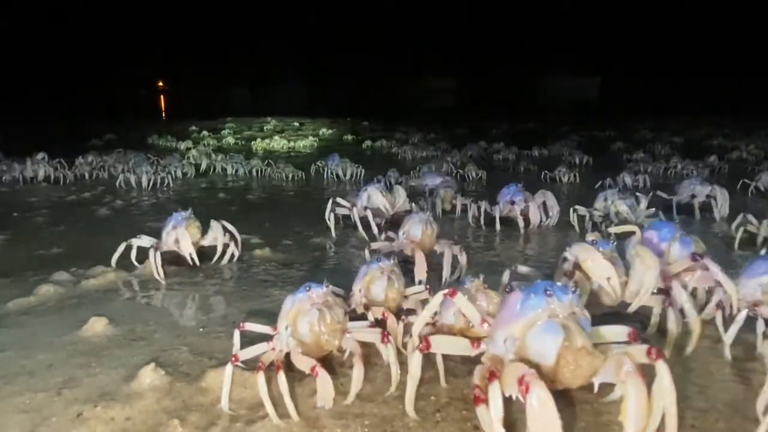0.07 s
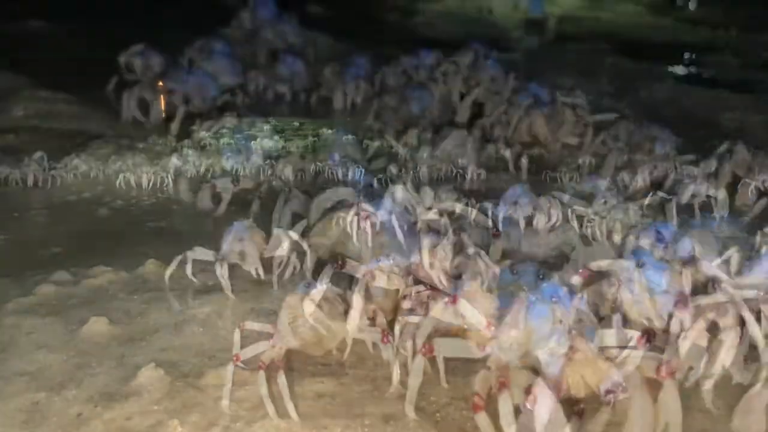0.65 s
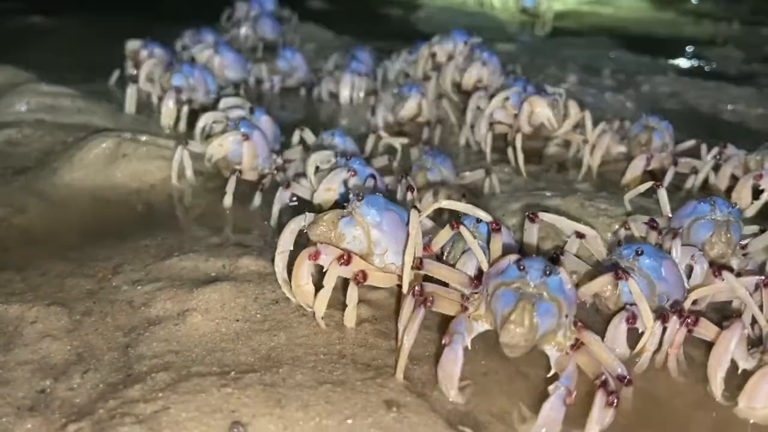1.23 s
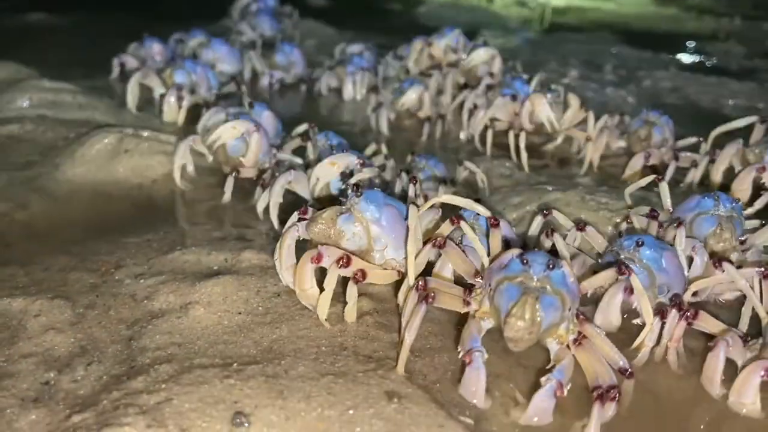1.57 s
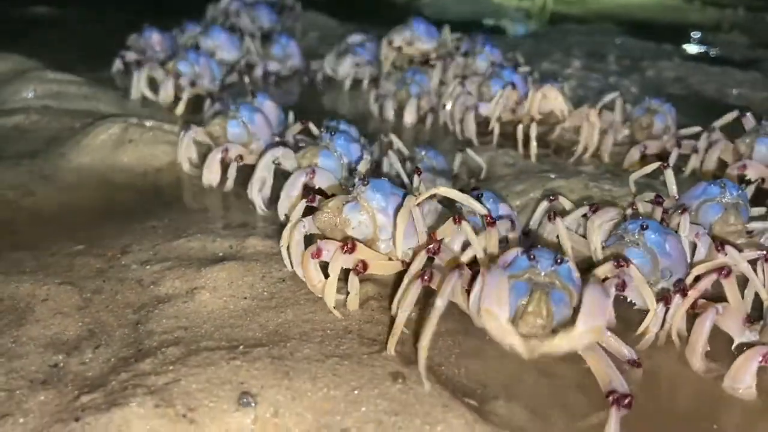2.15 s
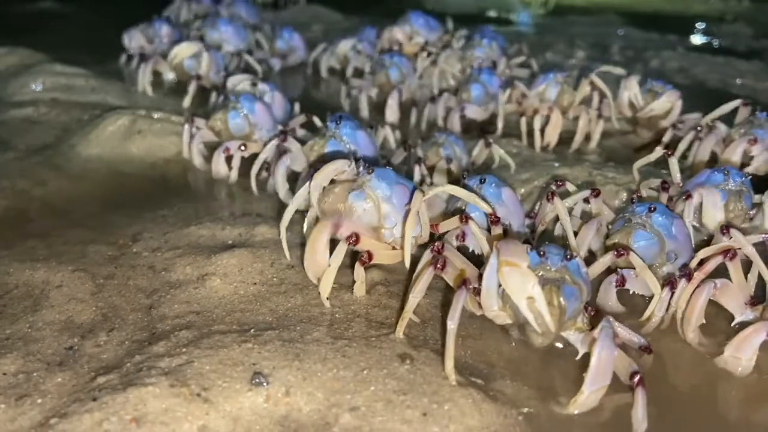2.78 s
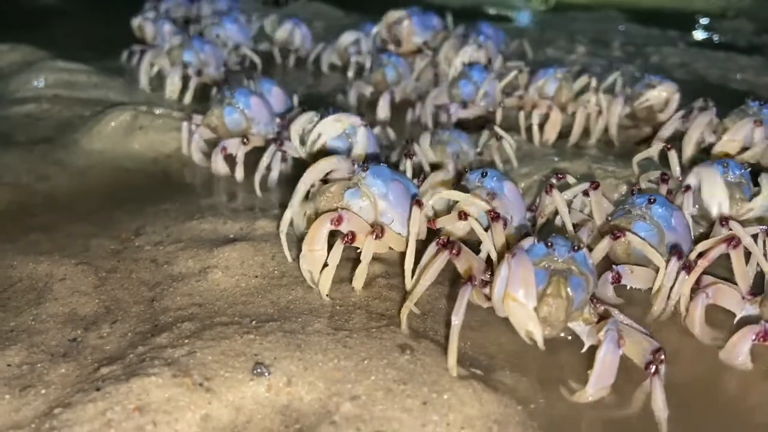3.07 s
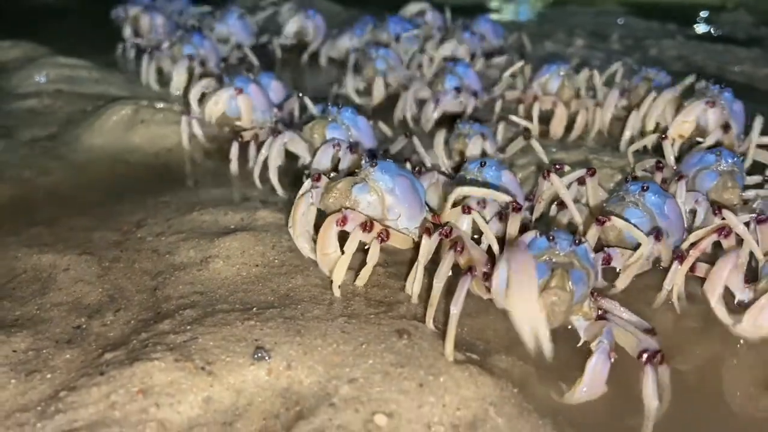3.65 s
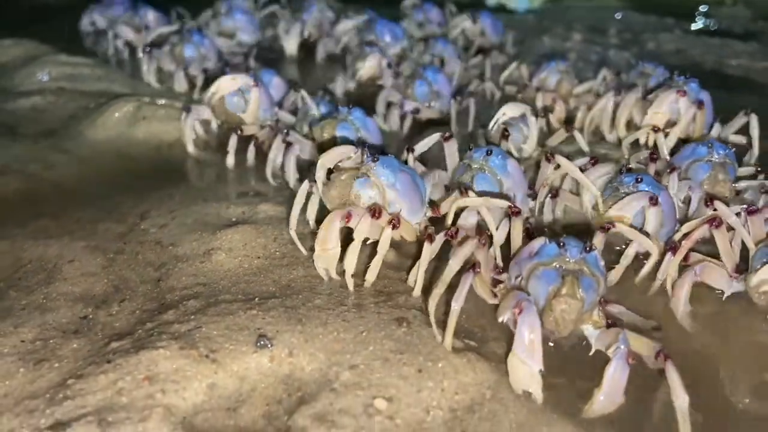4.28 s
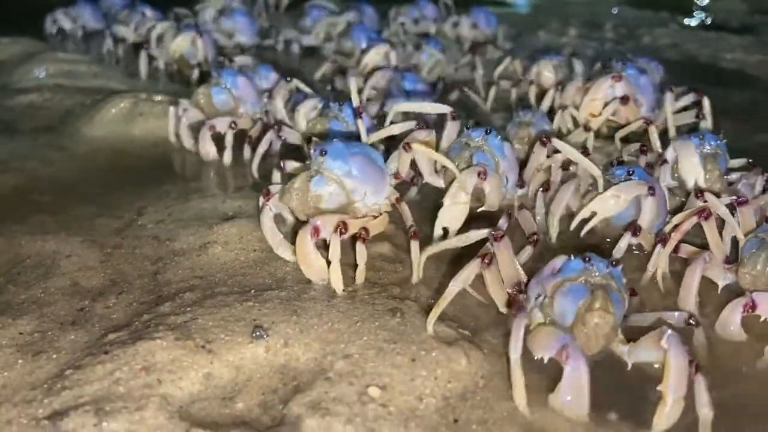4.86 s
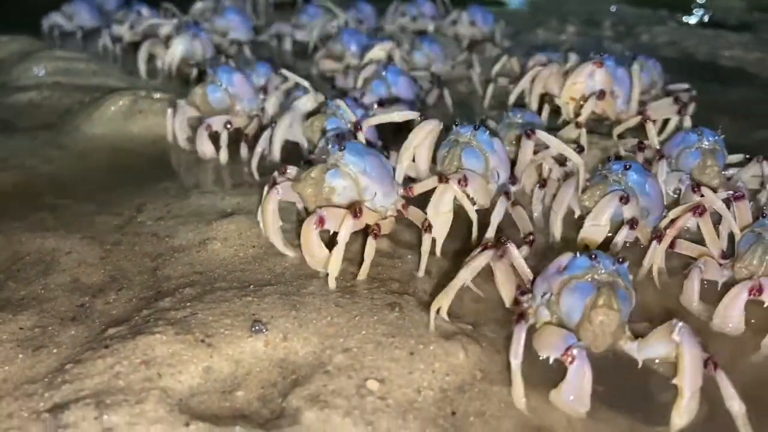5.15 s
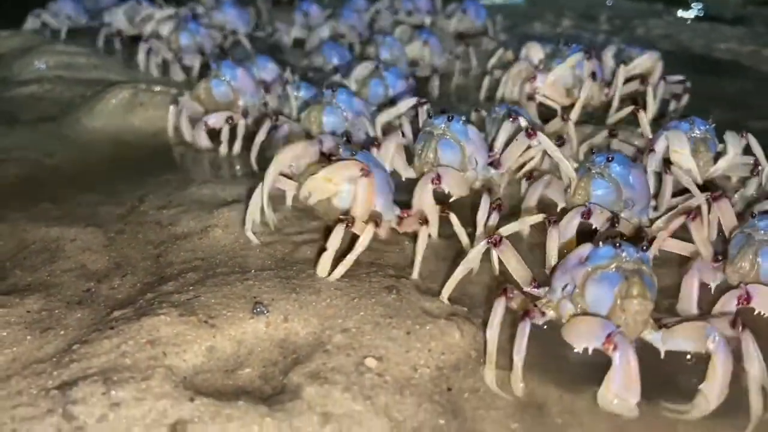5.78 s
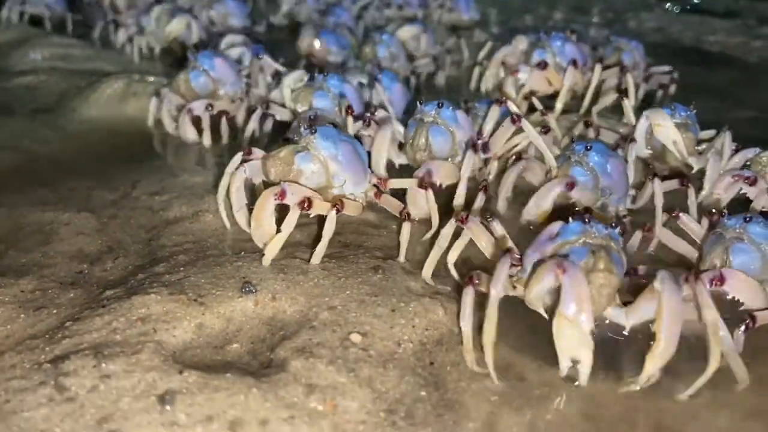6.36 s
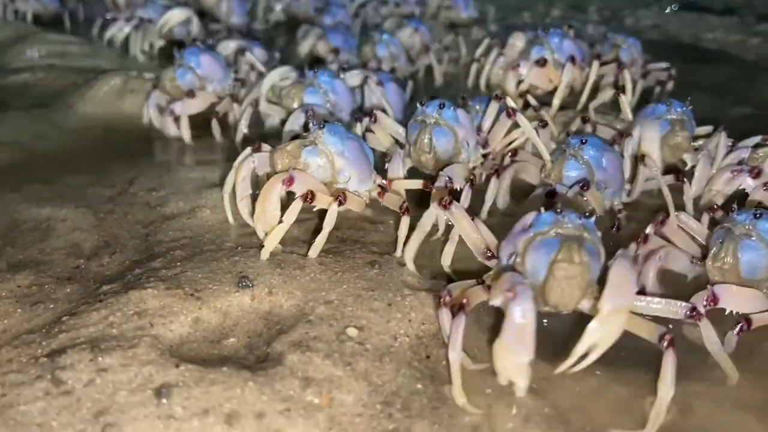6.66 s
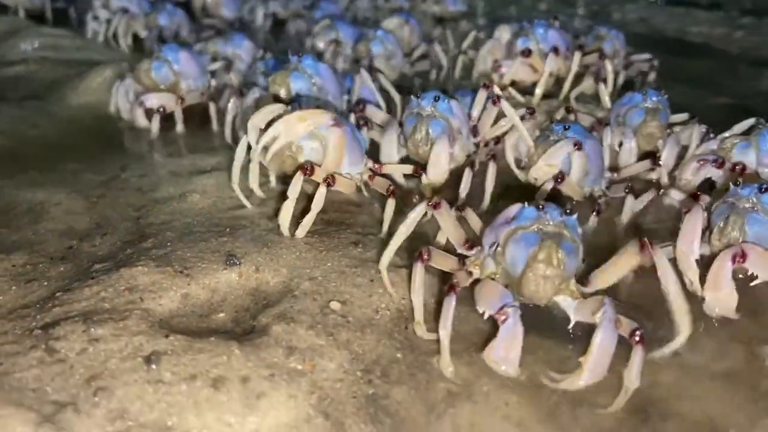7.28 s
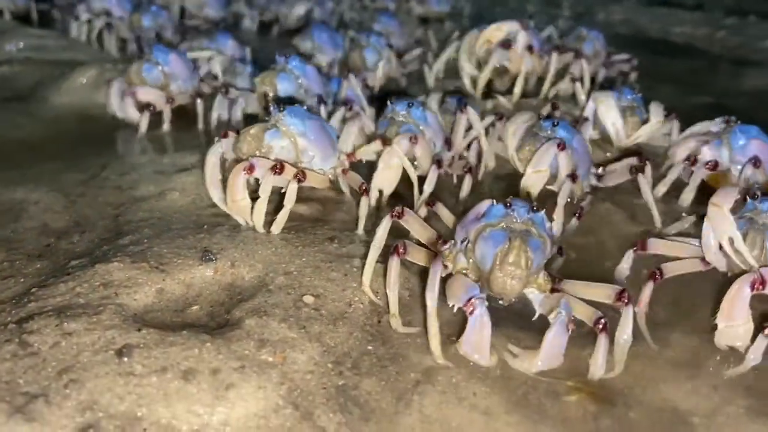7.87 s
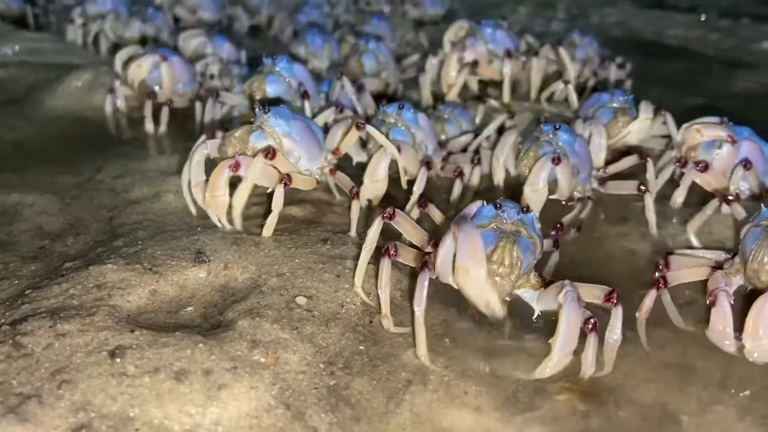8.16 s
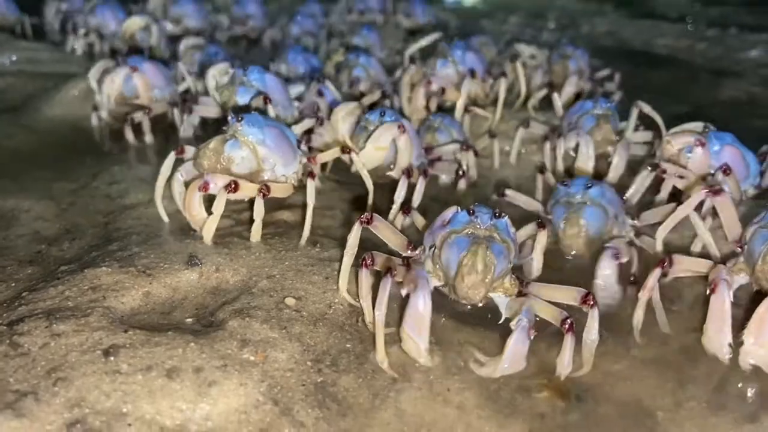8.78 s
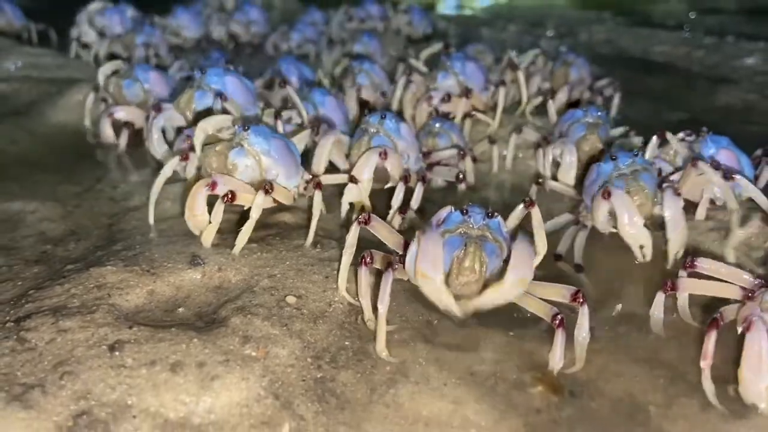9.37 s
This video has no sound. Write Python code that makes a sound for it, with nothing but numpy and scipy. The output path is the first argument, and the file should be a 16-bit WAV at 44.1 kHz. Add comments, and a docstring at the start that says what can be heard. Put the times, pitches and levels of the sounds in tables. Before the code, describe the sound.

A mass of small crabs walks over an open wet sand flat, close around the microphone, with no echo. From the start, countless leg tips make a bright, fizzing rustle dotted with sharp shell ticks and quick scrabbles. It is loudest in the first second, then thins steadily until about 4.5 seconds and continues as a lighter crackle to the end at 9.5 seconds. Throughout, feet pat the mud, water films pop and tiny bubbles plip, with stronger pops near 1 and 1.8 seconds, a tight cluster of clicks and pops at 3.4, and scattered plips from 6.6 to 7.5. Faint, thin, distant chirps come between 3 and 4.7 seconds, again a little after 6, and near 9. Light wind buffets the microphone in low, uneven puffs, strongest from 4 to 5.5 seconds, with more near 7 and a last one at the end.

```python
"""Crabs marching at night

An army of small crabs crosses a wet sand flat, on both sides of the microphone. Countless leg tips make
a fizzing rustle that thins out as the main crowd passes. Close by, shells tick, feet pat the mud, water
films pop and bubbles plip. Thin tones chirp far off, and a light wind buffets the microphone in puffs."""
import sys
import numpy as np
from scipy import signal
from scipy.fft import rfft, irfft, next_fast_len
from scipy.io import wavfile
from scipy.ndimage import uniform_filter1d

SR = 44100
rng = np.random.default_rng(int(sys.argv[2]) if len(sys.argv) > 2 else 0)


def digitize_waveform(pressure):
    """Quantize a signal to 16-bit integers and store it at the path in sys.argv[1].

    Rows of a 2-D input are taken as channels; values are limited to [-1, 1].
    """
    field = np.atleast_2d(pressure).T
    bounded = np.clip(field, -1, 1)
    quanta = np.round(bounded * 32767).astype(np.int16)
    wavfile.write(sys.argv[1], SR, quanta)


N = 420273

# the rustle of the march: (time [s], relative level [dB])
CROWD_LEVEL = [(0.0, -42), (0.87, -42), (2.45, -48.5), (2.66, -51), (4.63, -57.5), (5.37, -54),
               (5.76, -56.5), (9.45, -58.5)]
# the big crowd passes: (time [s], its share of the rustle [0-1])
CROWD_SHARE = [(0, 0.6), (1.5, 0.87), (2.6, 0.62), (3.5, 0.63), (4.3, 0), (9.5, 0)]
# tone colours of the big crowd, near legs and shell grit: (frequency [Hz], gain [dB])
CROWD_TONE = [(500, 6), (1400, -14), (2200, -10.5), (3200, 1.5), (4000, 3), (5200, 5.5), (7000, 1.5),
              (10000, -2.5), (13000, -6.5), (16000, -18.5)]
NEAR_TONE = [(500, -62), (1400, -3), (2400, -0.5), (3200, -2), (4200, 0.5), (5300, 2), (7000, -1),
             (8700, -11), (11000, -11), (13000, -22.5), (16000, -95)]
GRIT_TONE = [(1500, 15), (3500, 8), (6500, 7.5), (10500, -17), (16000, -16)]
# sound that comes from the right: (frequency [Hz], share [0-1])
FROM_RIGHT = [(300, 0.036), (700, 0.066), (1200, 0.63), (2200, 0.025), (4300, 0.1), (5800, 0.17),
              (7000, 0.056), (8500, 1), (16000, 0.28)]
# sound that comes from ahead: (frequency [Hz], share of the rest [0-1])
FROM_AHEAD = [(300, 0.48), (700, 0.015), (1300, 0.044), (2300, 0.38), (4300, 0.39), (7000, 0.57)]
# a near crab scrabbles: (middle time [s], level [dB], pitch [Hz], length [s])
SCURRIES = [(0.506, -38.5, 5600, 0.034), (0.637, -44, 2700, 0.058), (0.906, -43.5, 5700, 0.098),
            (0.983, -52, 2760, 0.067), (1.286, -47, 3700, 0.11), (1.408, -39.5, 3970, 0.034),
            (2.233, -42.5, 4460, 0.034), (2.407, -50, 4670, 0.066), (3.497, -47, 5300, 0.019),
            (3.873, -51, 6030, 0.025), (4.938, -49, 5000, 0.026), (5.23, -55, 4740, 0.033),
            (5.13, -54, 5760, 0.03), (7.393, -55.5, 634, 0.089), (7.6, -64, 646, 0.051),
            (8.631, -55.5, 6550, 0.037), (8.678, -60, 680, 0.12)]

# Pan is left minus right. Scrape, spatter and squelch are set against the level of their own hit.
# shells and claws knock: (time [s], relative level [dB], pitch [Hz], scrape [dB], pan [dB])
TICKS = [(0.2186, -29.5, 5300, -4, 3), (0.296, -27, 5200, -14, 2), (0.3715, -21.5, 4930, -37, 3),
         (0.479, -24, 6740, -27, 2), (0.552, -40, 5950, -18, 2), (0.591, -32, 5430, -18, 3),
         (0.645, -33, 3070, -12, 6), (0.767, -26, 5130, -18, 4), (0.8955, -30, 4680, -7, 6),
         (0.996, -30, 3200, -7, 1), (1.0005, -24.5, 4100, -7, -3), (1.009, -32, 3250, -9, 5),
         (1.268, -27.5, 3620, -20, 10), (1.399, -37, 4000, -6, 13), (1.453, -33.5, 5300, 1, 3),
         (1.5509, -30, 5400, -6, 4), (2.1855, -26, 4840, -10, 2.5), (2.6072, -39.5, 6640, -2.5, -1),
         (2.861, -36, 6550, -16, 1.5), (2.9155, -34, 6060, -14, 0), (2.9507, -28, 7300, -24, 3),
         (3.2512, -34, 4400, -8.5, 1), (3.433, -36, 7400, -9, 1), (3.4359, -32, 3000, -9, 3),
         (3.4432, -26, 2700, -9, 4), (3.4436, -30, 6400, -14, 1), (3.446, -30, 2360, -11, 4),
         (3.4465, -34, 7240, -10, 3), (3.4565, -39, 2800, -14, 3), (3.4605, -38, 2900, -5, 0),
         (3.4825, -40, 2700, -7, 4), (3.4877, -33, 6800, -9, 1), (3.5703, -43, 3530, -0.5, 6),
         (3.6225, -37, 5330, -3.5, 3), (3.8066, -39.5, 7600, -12, 3), (4.197, -40, 8150, -12, 1),
         (4.5236, -37, 5200, -12, 0), (4.82, -49, 9600, -15, 0), (4.9935, -37.5, 7160, -12, 1),
         (5.297, -47, 9800, -11, 0), (5.2084, -36, 6230, -27, 0.5), (5.2154, -35, 7100, -20, 0),
         (5.451, -40, 8100, -19, 1), (5.8592, -40, 5170, -14, 7), (7.0, -48, 9000, -15, 0),
         (7.35, -46.5, 9500, -14, 0), (7.426, -33.5, 4900, -14, 0.0), (7.5967, -48, 8100, -10, 0.5),
         (7.8506, -36.5, 4800, -6.5, 5), (8.25, -38.5, 6660, -13, -2), (8.875, -42, 6650, -15, 1.5),
         (9.0099, -37, 4360, -7.5, 3.0), (9.2884, -28, 5270, -15.5, 2), (9.482, -40, 7100, -21, 1.5)]
# water films pop: (time [s], relative level [dB], pitch [Hz], spatter [dB], pan [dB], ring [cycles])
POPS = [(0.19, -35, 2090, -14, -2, 12), (0.9677, -31.5, 2160, -20, 4, 14), (0.9989, -21.5, 2960, -19, 4, 5),
        (1.8161, -22.5, 2850, -31, 4, 12), (1.83, -37, 3000, -23, 3, 5), (1.8913, -27.5, 3100, -20, 5, 5),
        (2.275, -32, 2300, -15, -3, 5), (2.9046, -36, 2770, -15, 0, 17), (3.2515, -40, 2180, -8, 9, 4),
        (3.441, -21.5, 1840, -19, -8, 6.1), (3.5708, -37, 2400, -18, 3, 5),
        (3.7444, -29.5, 2320, -20, -3, 13), (3.8598, -42.5, 2560, -5, 1.5, 13),
        (3.9623, -39, 2480, -15, 3, 15), (4.6628, -40, 2100, -18, -8, 13), (5.209, -33, 2820, -10, 0.5, 13),
        (5.2147, -42, 2400, -16, -4, 4.4), (5.4253, -40.5, 1730, -12, -4, 9),
        (6.619, -40.5, 2020, -12, -1, 8.2), (7.067, -39, 2260, -17, -6, 13),
        (7.5152, -41.5, 2450, -10, -6, 14), (7.652, -39.5, 2380, -22, 0, 12),
        (7.7677, -40, 2080, -13, -4, 10), (7.782, -40, 3450, -13, 6, 13), (9.2514, -36, 2380, -18, -3, 9)]
# feet and bodies drop on mud: (time [s], ring level [dB], pitch [Hz], squelch [dB], pan [dB])
PATS = [(0.27, -39.5, 1180, -7, -6), (0.314, -37.5, 605, -8, 3), (0.55, -38, 740, -6, -4),
        (1.0, -37, 825, -7, 4), (1.019, -40, 900, -12, 2), (1.817, -33.5, 696, -10, 6),
        (1.819, -33, 302, -12, 0), (2.185, -35, 710, -11, 5.0), (2.226, -38, 790, -3.5, 0.5),
        (2.273, -37.5, 1000, -4, -1), (2.731, -51, 1000, -1, -5), (3.4404, -30, 1380, -9, 9),
        (3.444, -34, 600, -10, 3), (3.609, -41.5, 412, 0, 6), (3.613, -45, 855, -15, -2),
        (5.21, -51, 890, -5, 0), (5.24, -44, 373, -1, -1), (7.433, -48, 382, -11, -1),
        (8.502, -42, 350, 3, 0), (8.528, -41, 734, -7, 0), (9.085, -41.5, 390, -5, 6)]
# small bubbles burst: (time [s], peak level [dB], pitch [Hz], ring time [s], pan [dB])
PLIPS = [(0.976, -40.5, 1440, 0.026, 2), (2.73, -41.5, 1204, 0.023, -10), (3.008, -47.5, 1750, 0.032, -1),
         (3.283, -50, 1840, 0.019, -6), (3.4411, -25, 1380, 0.0095, -3), (4.097, -49, 2110, 0.018, -1),
         (4.656, -51, 1610, 0.045, -9), (5.858, -47, 3480, 0.016, 13), (6.623, -45, 2030, .02, -1),
         (6.716, -52, 1520, .03, 4), (6.844, -49.5, 2740, .022, 3), (6.871, -50, 2250, 0.018, 0),
         (6.928, -51, 1500, 0.021, -10), (7.414, -52, 1160, .04, 1), (7.434, -46.5, 1430, 0.02, -1),
         (7.489, -50, 1610, .04, -4), (7.515, -43.5, 3670, 0.011, 0), (7.516, -49, 2380, 0.019, -3),
         (8.597, -40, 1920, 0.015, -5)]
# soft footsteps and tiny bubbles: (time [s], relative level [dB])
PATTER_LEVEL = [(0.0, -54.5), (3.45, -59.5), (3.61, -55.5), (4.3, -61.5), (5.21, -60.5), (6.03, -61.5),
                (6.8, -59.5), (7.58, -57), (9.45, -60)]
FIZZ_LEVEL = [(0, -61.5), (1.0, -54.5), (2.6, -59), (3.2, -57), (3.85, -59.5), (4.1, -63.5), (6.6, -65),
              (8.0, -68.5), (9.5, -68)]
# tone colours of mud and bubbles: (frequency [Hz], gain [dB])
MUD_TONE = [(120, 6.5), (300, 2.5), (370, 1), (480, -1), (560, -2.5), (660, -1), (820, -4.5), (1000, -6),
            (1300, -6.5), (2500, -12.5), (6000, -44)]
BUBBLE_TONE = [(700, -41), (1200, -1), (1550, 2), (1900, 3.5), (2300, 4.5), (3000, 1), (5000, -44)]
# far tones: (start [s], length [s], first pitch [Hz], last pitch [Hz], level [dB], waver [share of pitch])
CHIRPS = [(3.18, 0.066, 1540, 1530, -57.5, .06), (3.284, 0.11, 1450, 1490, -65, .09),
          (3.498, 0.13, 1520, 1600, -60, .09), (4.215, 0.11, 1686, 1665, -59, .09),
          (4.491, 0.22, 1573, 1724, -64, .035), (6.174, 0.044, 2010, 1915, -57, .08),
          (6.529, 0.17, 1905, 1597, -60, .1), (9.108, 0.17, 3490, 3500, -67, 0.004)]

# the breeze between gusts: (time [s], relative level [dB])
BREEZE_LEVEL = [(0, -42), (1.6, -37), (2.2, -41), (3.9, -36.5), (5.4, -35), (5.8, -43), (6.53, -46.5),
                (6.7, -34), (7.45, -38.5), (7.75, -44.5), (8.05, -41.5), (9.53, -37.5)]
# gusts of wind: (start [s], length [s], buffeting [dB], eddies [dB])
GUSTS = [(.005, 0.015, -22.5, -33), (0.049, 0.094, -33, -34), (0.372, 0.012, -29, -50),
         (0.49, 0.011, -34, -47), (1.124, 0.005, -44, -26.5), (1.316, 0.092, -38, -41.5),
         (1.815, 0.013, -51, -32.5), (1.95, 0.0083, -34.5, -59), (2.701, 0.042, -48, -41),
         (3.004, 0.0057, -25, -39), (3.246, 0.011, -28, -44), (3.889, 0.078, -30, -59),
         (4.058, 0.052, -35, -35), (4.12, 0.098, -21, -32.5), (4.239, 0.04, -23, -58),
         (4.363, 0.036, -27.5, -61), (4.458, 0.014, -24.5, -55), (4.604, 0.15, -24.5, -40.5),
         (4.701, 0.012, -21, -32), (4.799, 0.032, -35, -61), (4.88, 0.0087, -25.5, -64),
         (4.99, 0.006, -22.5, -51), (5.026, 0.0051, -29.5, -40), (5.09, 0.042, -25, -40),
         (5.143, 0.061, -26, -33.5), (5.253, 0.0079, -17.5, -29.5), (5.331, 0.069, -28, -34.5),
         (5.453, 0.084, -34.5, -63), (5.85, 0.016, -38.5, -51), (5.975, 0.049, -43, -45.5),
         (6.105, 0.012, -36.5, -42), (6.187, .012, -48, -46), (6.4, 0.027, -39.5, -50),
         (6.786, 0.014, -22, -37), (6.832, 0.011, -43, -30.5), (7.016, 0.021, -50, -37),
         (7.144, 0.037, -31, -34.5), (7.224, 0.084, -35.5, -49), (7.379, 0.014, -35, -34.5),
         (7.525, 0.0086, -32, -44), (7.57, 0.0091, -47, -61), (8.222, 0.012, -40, -51),
         (8.545, 0.0088, -37, -35.5), (8.737, 0.026, -36, -54), (8.837, 0.005, -28, -48),
         (9.204, 0.009, -33, -52), (9.473, 0.032, -19.5, -25.5)]
# the air falls still for a moment: (middle time [s], length [s], depth [dB])
LULLS = [(0.253, 0.052, -9), (1.598, 0.024, -8), (2.305, 0.031, -16), (2.82, 0.042, -7), (2.972, 0.04, -18),
         (3.361, 0.06, -13), (4.97, 0.02, -8), (5.009, 0.016, -27), (4.53, 0.0093, -6), (5.276, 0.024, -10),
         (5.609, 0.023, -15), (5.805, 0.046, -23), (6.082, 0.023, -10), (6.13, 0.03, -13), (6.53, 0.1, -8),
         (6.907, 0.04, -4), (7.124, 0.019, -15), (7.478, 0.041, -6), (7.69, 0.1, -8.5), (7.9, 0.066, -7.5),
         (8.65, 0.11, -12), (9.032, 0.035, -11), (9.378, 0.14, -6)]
# tone colours of the deep buffeting and of the eddies, small swirls of air: (frequency [Hz], gain [dB])
BUFFET_TONE = [(15, -37), (25, -31), (40, -8.5), (52, 0), (85, 0.5), (115, -9.5), (160, -22), (300, -67),
               (600, -99)]
EDDY_TONE = [(60, -59), (100, -5.5), (130, 0), (190, -5), (250, -13.5), (330, -25), (600, -47.5),
             (2000, -78)]

THIN_CROWD_DB = -57   # CROWD_LEVEL once the big crowd has passed
SIDES = np.array([[.5], [-.5]])   # half of a difference goes to the left, minus half to the right


def leg_rustle(crowd_left_db=1.5):
    """Countless leg tips strike wet sand; their tiny clicks blur into a rustle."""
    level_db, = in_time(CROWD_LEVEL)
    share = np.clip(in_time(CROWD_SHARE)[0], 0, 1)
    groups = []
    for _ in range(4):
        steps = grains(per_s=8800, spread_db=0.25, patchy_db=4.6, low_hz=893, high_hz=16460, count=13)
        steps *= from_db(0.88 * drift(35))
        groups.append(steps + from_db(-10.5) * clicks(per_s=110, spread_db=2.0))
    legs = surround(groups)
    blend = share * coloured(legs, CROWD_TONE) + (1 - share) * coloured(legs, NEAR_TONE)
    return from_db(level_db + 2.0) * blend * from_db(SIDES * crowd_left_db * share)


def grit_snaps():
    """Stray leg tips snap on shell grit, louder while the crowd is thick."""
    crowd_db = in_time(CROWD_LEVEL)[0] - THIN_CROWD_DB
    beside, ahead = [grains(per_s=32, spread_db=3.5, patchy_db=4.0, low_hz=2470, high_hz=12800, count=4)
                     for _ in range(2)]
    return from_db(crowd_db - 73) * coloured(from_right(beside) + ahead, GRIT_TONE)


def scurries(steps_per_s=1200):
    """Quick runs of leg tips swell and fade, each around its own pitch."""
    out, t = np.zeros((2, N + SR)), np.arange(SR // 4) / SR
    for middle, level_db, hz, length in SCURRIES:
        shared, apart = rng.standard_normal((2, len(t))) * (rng.random((2, len(t))) < steps_per_s / SR)
        steps = shared + from_db(-9.5) * apart * 2 * SIDES
        steps = rms_one(band_pass(steps + 1e-18, hz / 1.38, hz * 1.27))
        envelope = np.exp(-2 * ((t - t.mean()) / length) ** 2)
        add_at(out, middle - t.mean(), from_db(level_db) * steps * envelope)
    return out[:, :N]


def shell_ticks():
    """Shells and claws knock together and ring briefly."""
    return from_db(2.5) * contacts(TICKS, cycles=10.7, crack_db=-8, crack_top_hz=10200,
                                   spray_s=0.019, spray_width=0.42)


def film_pops():
    """Films of water pop under the legs and spatter."""
    hits, cycles = [row[:-1] for row in POPS], [row[-1] for row in POPS]
    return from_db(1.0) * contacts(hits, cycles, crack_db=-9, crack_top_hz=5000,
                                   spray_s=0.11, spray_width=0.47)


def mud_pats():
    """Near feet and bodies slap the mud, which squelches."""
    return contacts(PATS, cycles=6.1, crack_db=8.5, crack_top_hz=2700, spray_s=0.062, spray_width=0.45)


def crackles(thin_crowd_per_s=8, low_hz=2700, high_hz=7300):
    """Crabs a little farther off make small wet clicks, more of them while the crowd is thick."""
    crowd_db, = in_time(CROWD_LEVEL)
    per_s = thin_crowd_per_s * from_db(1.2 * (crowd_db - THIN_CROWD_DB))
    count_so_far = np.cumsum(per_s) / SR
    draws = rng.random((400, 4))[:int(count_so_far[-1]) - 2]
    hits = []
    for k, (delay, size, pitch, side) in enumerate(draws):
        at = np.searchsorted(count_so_far, k + 3 * delay)
        hz = low_hz * (high_hz / low_hz) ** pitch
        level_db = crowd_db[at] + 3.5 + 3.6 * size ** 2
        hits.append((at / SR, level_db, hz, -15, 12 * (side - .5)))
    return contacts(hits, cycles=13.5, crack_db=-22, crack_top_hz=9000, spray_s=0.0071, spray_width=0.28)


def mud_patter():
    """Many feet make a dull patter in the mud, with heavier steps close by."""
    steps = surround([clicks(per_s=1300, spread_db=1.0) for _ in range(4)])
    steps += from_db(-12.0) * clicks(per_s=90, spread_db=3.0)
    return from_db(in_time(PATTER_LEVEL)[0] + 7.0 + 1.9 * drift(9)) * coloured(steps, MUD_TONE)


def bubble_fizz():
    """Tiny bubbles ring briefly and merge into a fizz."""
    bubbles = surround([grains(per_s=750, spread_db=4.5, patchy_db=6.0, low_hz=1127, high_hz=2850, count=7)
                        for _ in range(4)])
    return from_db(in_time(FIZZ_LEVEL)[0] + 0.54 * drift(11)) * coloured(bubbles, BUBBLE_TONE)


def bubble_plips(rise_per_s=4.2):
    """A small bubble bursts with a clear note; its pitch rises as it surfaces."""
    out, t = np.zeros((2, N + SR)), np.arange(SR // 12) / SR
    for start, peak_db, hz, ring_s, pan_db in PLIPS:
        age = 10 * t / ring_s
        note = np.sin(2 * np.pi * hz * t * (1 + rise_per_s * t / 2)) * age * np.exp(1 - age)
        add_at(out, start, note * from_db(peak_db + SIDES * pan_db))
    return out[:, :N]


def far_chirps(flutter_db=2):
    """Thin squeaks fade in, glide and fade out; the more they waver, the hoarser they sound."""
    out = 0
    for start, length, first_hz, last_hz, level_db, waver in CHIRPS:
        hz, = in_time([(start, first_hz), (start + length, last_hz)])
        envelope = swell(start, length, attack_s=0.016, release_s=0.039)
        level = from_db(level_db + flutter_db * drift(45)) * envelope
        width_hz = np.clip(2 * waver * first_hz, 5, 400)
        phase = 2 * np.pi * np.cumsum(hz) / SR
        out += level * (drift(width_hz) * np.sin(phase) + drift(width_hz) * np.cos(phase))
    return out


def wind(flutter_db=4.5, puffs_per_s=26, low_cut_hz=37.7):
    """Breeze and gusts press on the microphone and shed eddies; it picks up little of the deepest bass."""
    breeze_db, = in_time(BREEZE_LEVEL)
    buffet_gain = from_db(breeze_db + 0.5 + flutter_db * drift(puffs_per_s))
    eddy_gain = from_db(breeze_db - 11)
    for start, length, buffet_db, eddy_db in GUSTS:
        gust = swell(start, length, attack_s=0.0053, release_s=0.0096)
        buffet_gain = np.hypot(buffet_gain, from_db(buffet_db) * gust)
        eddy_gain = np.hypot(eddy_gain, from_db(eddy_db) * gust)
    buffet = buffet_gain * turbulence(BUFFET_TONE, apart_db=-13.5, lump_s=0.0327, flutter_db=1.0)
    eddies = eddy_gain * turbulence(EDDY_TONE, apart_db=-5.0, lump_s=0.028, flutter_db=4.0)
    t = np.arange(N) / SR
    lull_db = sum(depth_db * np.exp(-np.minimum((2 * (t - middle) / length) ** 2, 20))
                  for middle, length, depth_db in LULLS)
    return shaped((buffet + eddies) * from_db(lull_db), lambda hz: 1 - np.exp(-(hz / low_cut_hz) ** 4))


def turbulence(tone, apart_db, lump_s, flutter_db):
    """Lumps of air pressure, mostly the same on the left and right."""
    shared, apart = coloured(rng.standard_normal((2, N)), tone)
    strength = np.sqrt(uniform_filter1d(shared ** 2, int(lump_s * SR)) + 0.22)
    pressure = shared / strength + from_db(apart_db) * apart * 2 * SIDES
    return pressure * rms_one(from_db(flutter_db * drift(35)))


def contacts(hits, cycles, crack_db, crack_top_hz, spray_s, spray_width, side_phase_rad=0.85):
    """Each hit cracks, rings out and leaves a short spray of grains around the same pitch."""
    out, t = np.zeros((2, N + SR)), np.arange(SR // 20) / SR
    noise = rng.standard_normal((len(hits), 2, len(t)))
    for hit, ring_cycles, (shared, apart) in zip(hits, np.broadcast_to(cycles, len(hits)), noise):
        start, level_db, hz, spray_db, pan_db = hit
        age = 10 * t * hz / max(ring_cycles, 2)
        phase = 2 * np.pi * hz * t + side_phase_rad * np.sign(apart[-1]) * SIDES
        ring = np.sin(phase) * age * np.exp(1 - age)
        hiss = shared + SIDES * apart
        spray = rms_one(band_pass(hiss * abs(hiss), hz / (1 + spray_width), hz * (1 + spray_width)))
        spray *= from_db(spray_db - 60 * t / spray_s)
        crack = band_pass(1. * (t == 0), hz / 2, crack_top_hz)
        sound = ring + from_db(crack_db) * crack / crack.max() + spray
        add_at(out, start, sound * from_db(level_db + SIDES * pan_db))
    return out[:, :N]


def grains(per_s, spread_db, patchy_db, low_hz, high_hz, count):
    """Clicks ring in a number of pitch bands, each band in flurries of its own."""
    edges, out = np.geomspace(low_hz, high_hz, count + 1), 0
    for low, high in zip(edges, edges[1:]):
        strikes = clicks(per_s / count, spread_db) * from_db(patchy_db * drift(45))
        out += band_pass(strikes + 1e-18, low, high)
    return out


def clicks(per_s, spread_db):
    """Clicks at random times, many small and a few large."""
    chance = rng.random(N)
    at = np.flatnonzero(chance < per_s / SR)
    size = np.minimum(-np.log(chance[at] * SR / per_s + 1e-12), 5)
    out = np.zeros(N)
    out[at] = from_db(spread_db * size) * (-1.) ** at
    return rms_one(out)


def surround(groups):
    """Place four groups of sounds: one to the right, one ahead, two all around."""
    right = lambda hz: np.clip(at_hz(FROM_RIGHT, hz), 0, .995)
    ahead = lambda hz: np.clip(at_hz(FROM_AHEAD, hz), 0, 1)
    beside = from_right(shaped(groups[0], lambda hz: np.sqrt(right(hz))))
    front = shaped(groups[1], lambda hz: np.sqrt((1 - right(hz)) * ahead(hz)))
    around = shaped(np.array(groups[2:]), lambda hz: np.sqrt((1 - right(hz)) * (1 - ahead(hz))))
    return beside + front + around


def from_right(x, lag_s=0.0002756):
    """A sound from the right reaches the left channel a little later."""
    return np.array([shaped(x, lambda hz: np.exp(-2j * np.pi * hz * lag_s)), x])


def swell(start, length, attack_s, release_s):
    """A level that is fully up at its start time, holds and dies away."""
    t = np.arange(N) / SR
    rise = np.maximum((start - t) / attack_s, 0) ** 2
    fall = np.maximum((t - start - length) / release_s, 0)
    return np.exp(-np.minimum(rise + fall, 20))


def drift(per_s):
    """Glide between random values, per_s of them a second."""
    values = rng.standard_normal(4096)
    return np.interp(np.arange(N) * per_s / SR, np.arange(len(values)), values)


def coloured(x, tone):
    """Give x a tone colour and an average strength of 1."""
    return rms_one(shaped(x, lambda hz: from_db(at_hz(tone, hz))))


def shaped(x, response):
    """Filter x by a gain given as a function of frequency."""
    size = next_fast_len(N + SR // 10, real=True)
    hz = np.arange(size // 2 + 1) * SR / size
    return irfft(rfft(x, size) * response(hz), size)[..., :N]


def band_pass(x, low_hz, high_hz):
    """Keep what lies between two frequencies."""
    band = [low_hz, min(high_hz, .45 * SR)]
    return signal.sosfilt(signal.butter(2, band, "band", fs=SR, output="sos"), x)


def add_at(out, start_s, sound):
    """Mix a short stereo sound into out."""
    at = int(start_s * SR)
    out[:, at:at + sound.shape[1]] += sound


def in_time(rows):
    """Read a time table at every sample."""
    times, *columns = np.transpose(rows)
    return [np.interp(np.arange(N) / SR, times, column) for column in columns]


def at_hz(rows, hz):
    """Read a frequency table, with octaves evenly spaced."""
    frequencies, values = np.transpose(rows)
    return np.interp(np.log(hz + 1), np.log(frequencies), values)


def from_db(db):
    """Decibels to gain."""
    return 10 ** (np.asarray(db) / 20)


def rms_one(x):
    """Scale to an average strength (rms) of 1."""
    return x / np.sqrt(np.mean(x ** 2) + 1e-20)


def scene():
    """The open flat gives no echo: the sources simply add."""
    return (leg_rustle() + grit_snaps() + scurries() + mud_patter() + bubble_fizz() + shell_ticks()
            + film_pops() + mud_pats() + bubble_plips() + far_chirps() + wind() + crackles())


def record(dry):
    """The highest treble is cut steeply."""
    cutoff_hz = 15900
    return signal.sosfilt(signal.ellip(10, .1, 80, cutoff_hz, fs=SR, output="sos"), dry)


dry = scene()
out = record(dry)
digitize_waveform(out)
```